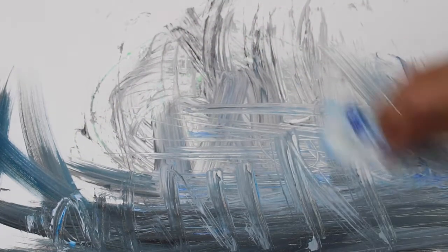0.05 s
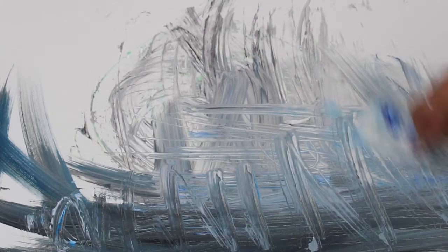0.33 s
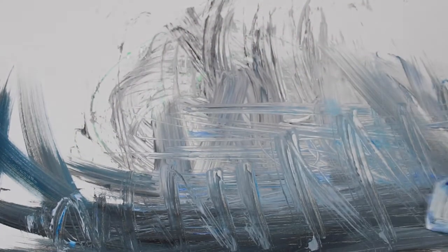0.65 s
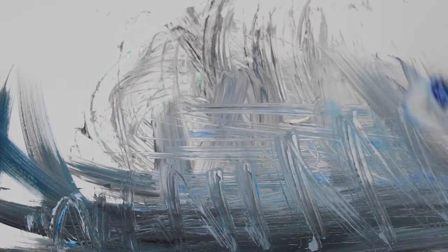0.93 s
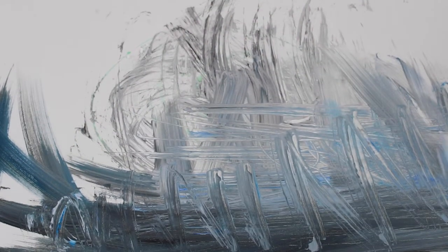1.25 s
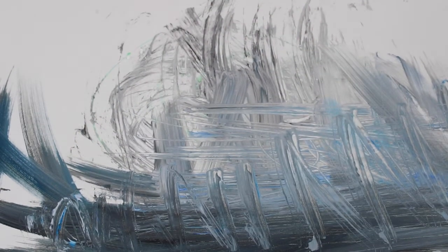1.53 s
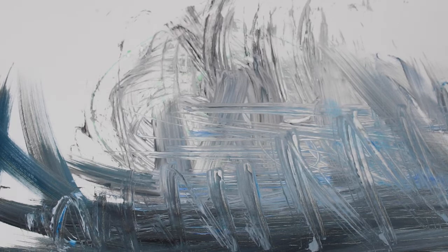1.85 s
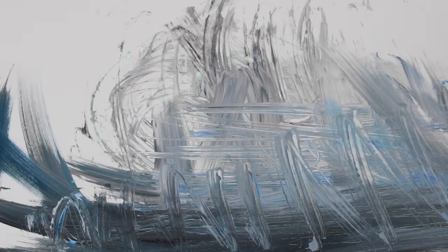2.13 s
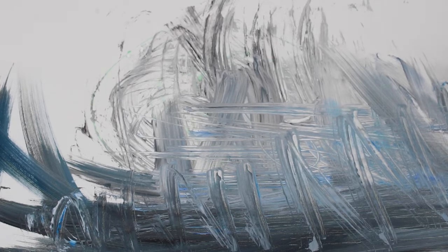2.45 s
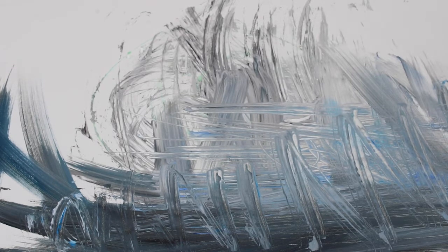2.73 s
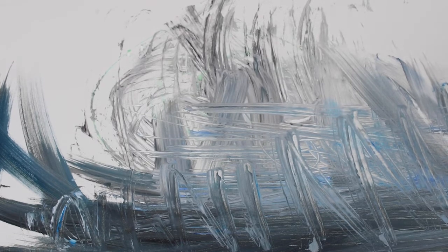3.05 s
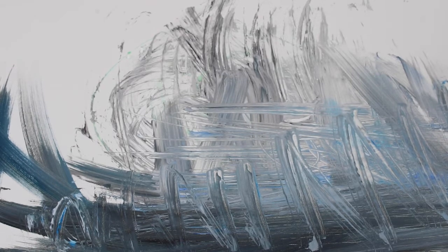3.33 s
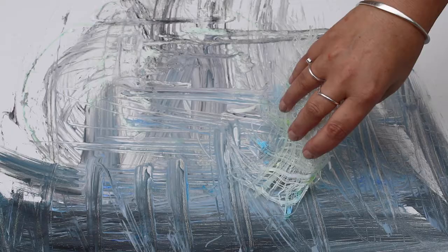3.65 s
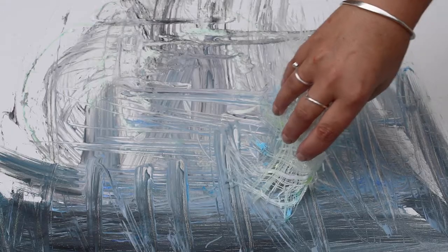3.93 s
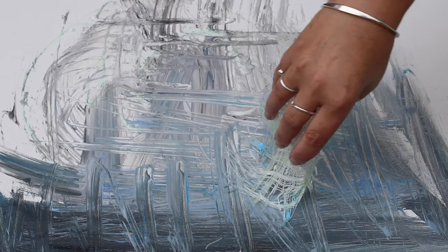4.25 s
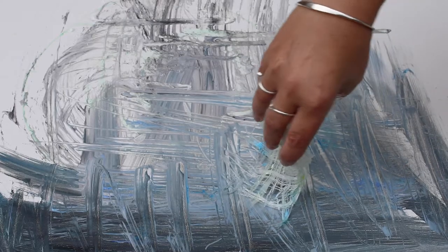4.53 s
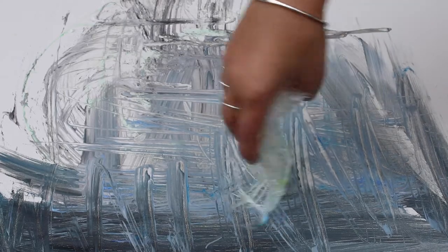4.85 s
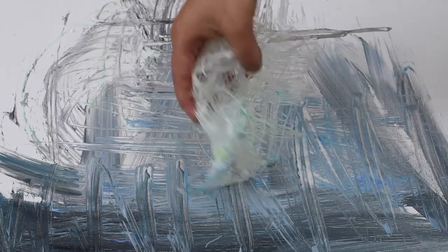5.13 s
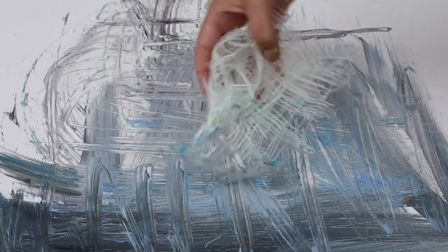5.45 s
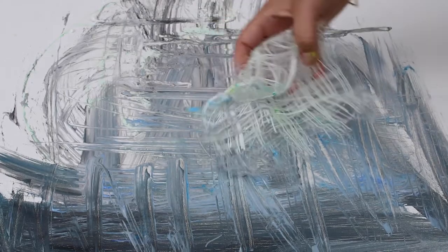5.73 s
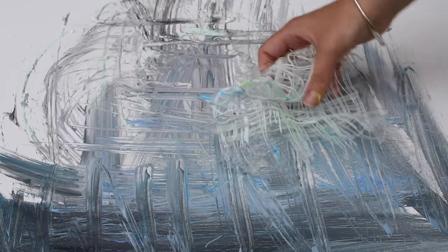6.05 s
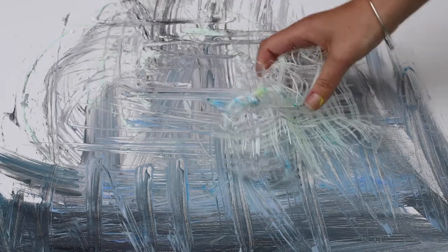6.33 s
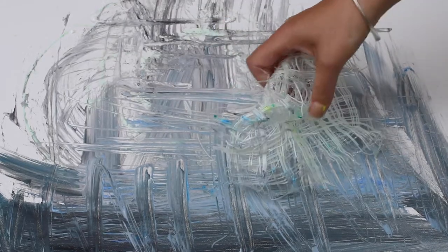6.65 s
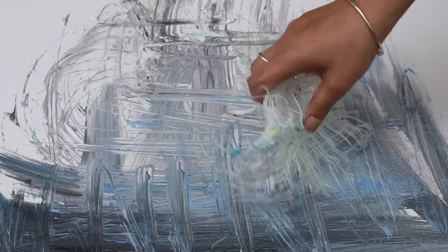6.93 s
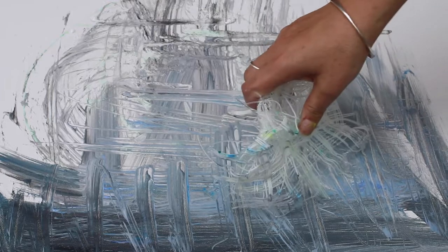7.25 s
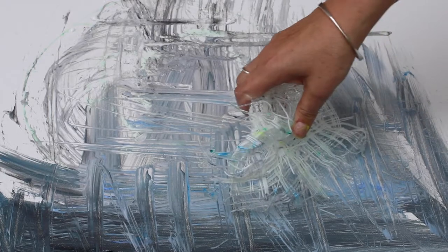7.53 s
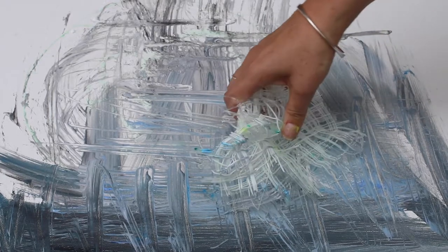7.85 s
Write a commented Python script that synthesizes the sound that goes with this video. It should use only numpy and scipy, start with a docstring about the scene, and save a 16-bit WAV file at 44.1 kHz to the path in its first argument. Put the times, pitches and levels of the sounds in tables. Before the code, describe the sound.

Close up in a small room, fast wet scrubbing opens the sound: a sponge rasps and swishes over a painted board, its ribs giving a rough, arching note with every stroke. After a short pause, a crumpled plastic mesh wad is handled, making sparse, quiet ticks and snaps. It rubs softly over the board and lands several times with a small crack and a low thud.

```python
"""A ribbed sponge scrubs back and forth through wet paint on a board, close by in a small room.
Its ribs sing a note that arches with the speed of each stroke, over a gritty rasp and a wet hiss
that grow with speed and grip: the pad bites after each turn and glides as the hand eases.
Then a wad of plastic mesh is lifted, crackling faintly, and dabbed on the board, which thuds."""
import sys
import numpy as np
from scipy import signal
from scipy.fft import rfft, irfft
from scipy.io import wavfile
from scipy.ndimage import uniform_filter1d

SR = 44100
rng = np.random.default_rng(int(sys.argv[2]) if len(sys.argv) > 2 else 0)


def master_out(mix):
    """Clip the mix to full scale and print it as 16-bit PCM to the path in sys.argv[1]."""
    frames = np.transpose(np.atleast_2d(mix))
    ceiling = np.clip(frames, -1, 1)
    pcm = np.round(ceiling * 32767).astype(np.int16)
    wavfile.write(sys.argv[1], SR, pcm)


N = 348390
TIME = np.arange(N) / SR


def sponge():
    """The scrub: rib note, rasp, wet hiss and board rumble, all riding the strokes."""
    rib_hz, bright_db, note_db, rasp_db, hiss_db = friction()
    grab_db = 0.48 * wander(70)  # the pad grabs and lets go
    note = rib_note(rib_hz) * amp(note_db - 4)
    rasp = gritty_rasp(bright_db) * amp(rasp_db + grab_db)
    hiss = wet_hiss(bright_db) * amp(hiss_db + grab_db)
    fade_out = np.clip((3.6 - TIME) / .055, 0, 1)
    return (note + rasp + hiss + board_rumble(rasp_db)) * fade_out


# Sponge strokes; lean is the push into the end of a stroke, sing is where the ribs ring best:
# start_s, bite_s, fastest_s, ease_s, stop_s, top_rib_hz, bright_db,
# note_db, rasp_db, hiss_db, lean_db, bite_db, sing_s
SPONGE_STROKES = [(-.12, -.1, -.015, .034, .05, 1350, 4, -26, -29, -29.5, -.5, 0, -.015),
                  (.03, .052, 0.135, .184, .28, 1252, 8, -25.5, -26.5, -24, 2, 0, .122),
                  (.279, .292, 0.414, .458, .502, 1376, 6, -22, -21.7, -22.7, .5, 0, .41),
                  (.489, .512, 0.602, .598, .748, 1324, 7.5, -24, -26, -26, -2, 0, .56),
                  (.736, .748, .883, .907, .957, 1268, 5.5, -24, -21.5, -23.5, -1, 0, .835),
                  (.957, .98, 1.071, 1.19, 1.199, 1230, 2, -24.5, -24.5, -25, -2, 0, 1.07),
                  (1.199, 1.222, 1.349, 1.413, 1.459, 1281, 2, -25, -21.5, -23, 3, 2, 1.4),
                  (1.436, 1.469, 1.553, 1.634, 1.697, 1274, .5, -24, -24, -22.5, -3, 3, 1.53),
                  (1.674, 1.722, 1.855, 1.907, 1.956, 1069, 1, -26, -28, -24, .5, 1, 1.84),
                  (1.946, 1.972, 2.079, 2.144, 2.243, 957, 0, -31, -30, -26, -1, 1, 2.05),
                  (2.253, 2.311, 2.431, 2.491, 2.553, 1085, 0, -24.3, -31.5, -23.2, 1, 3, 2.41),
                  (2.542, 2.572, 2.726, 2.712, 2.885, 1065, -2.5, -26, -29, -24.3, -2, 0, 2.615),
                  (2.882, 3.041, 3.101, 3.19, 3.229, 1147, -4.5, -26.5, -32, -28, -1.5, 6.5, 3.145),
                  (3.214, 3.257, 3.395, 3.39, 3.62, 1043, -2, -26, -31, -25.5, .7, 1, 3.305)]
def stroke_motion():
    """The hand speeds up, slows and turns: speed (0 to 1), progress (-1 to 1) and the live stroke."""
    speed, progress, row = np.zeros(N), np.zeros(N), np.zeros(N, int)
    for k, (start_s, _, fastest_s, _, stop_s, *_) in enumerate(SPONGE_STROKES):
        moving = np.flatnonzero((TIME > start_s) & (TIME < stop_s))
        travel = np.interp(TIME[moving], [start_s, fastest_s, stop_s], [-1, 0, 1])
        arch = np.cos(travel * np.pi / 2)
        leads = arch >= speed[moving]  # where strokes overlap, the faster wins
        at = moving[leads]
        speed[at], progress[at], row[at] = arch[leads], travel[leads], k
    return speed, progress, np.transpose(SPONGE_STROKES)[:, np.maximum.accumulate(row)]


NOTE_POWER, RASP_POWER, HISS_POWER = 1.25, 1.5, 1.85  # amplitude grows as this power of speed
CREEP = .16  # share of top speed left at a turn, where the pad still rolls over
PRESS_S, BITE_S, EASE_S = .005, .06, .03  # grip attack, decay of the bite, grip release
GLIDE_DB, NOTE_GLIDE_DB = -6, -8.5  # friction and note drop while the pad only glides
SING_DB, SING_WIDTH_S = 5, .035  # the ribs swell for a moment as they lie flat on the board
def friction():
    """Speed and grip of the pad set the rib rate and the note, rasp and hiss levels of each stroke."""
    speed, progress, stroke = stroke_motion()
    _, bite_s, _, ease_s, _, top_rib_hz, bright_db = stroke[:7]
    note_db, rasp_db, hiss_db, lean_db, bite_db, sing_s = stroke[7:]
    speed_db = 20 * np.log10(np.hypot(speed, CREEP) / np.hypot(1, CREEP))
    held_s = np.maximum(TIME - bite_s, 0)
    grip = np.minimum(held_s / PRESS_S, 1) * np.clip(1 - (TIME - ease_s) / EASE_S, 0, 1)
    press_db = lean_db * progress + GLIDE_DB * (1 - grip) + bite_db * grip * np.exp(-held_s / BITE_S)
    sing_db = NOTE_GLIDE_DB * (1 - grip) + SING_DB * np.exp(-((TIME - sing_s) / SING_WIDTH_S) ** 2)
    levels = [bright_db,
              note_db + NOTE_POWER * speed_db + sing_db,
              rasp_db + RASP_POWER * speed_db + press_db,
              hiss_db + HISS_POWER * speed_db + press_db]
    return top_rib_hz * speed, *uniform_filter1d(np.array(levels), size=150)


# Board resonances under the note, rasp and rumble: freq_hz, width_hz, gain_db
BOARD_RESONANCES = [(530, 50, -0.5), (967, 103, 3.5), (1272, 38, 9), (1305, 46, -7), (1477, 65, 2),
                    (1853, 39, 4.5), (2270, 110, 1), (2320, 45, -2), (3030, 80, 5), (3780, 91, 3)]
# Tone of the rib note: freq_hz, gain_db
NOTE_EQ = [(250, -2.5), (600, -3), (1000, -2), (1300, -3), (3000, -2.5)]
# Partials of the rib note: rib_rate_ratio, blur_hz, level_db
NOTE_PARTIALS = [(1, 32, -0.5), (1, 128, -4), (.5, 29, -19), (1.52, 71, -9), (2, 57, -13.5)]
def rib_note(rib_hz):
    """Many ribs catch at the same rate but out of step, so the note is fuzzy."""
    note = np.zeros(N)
    for ratio, blur_hz, level_db in NOTE_PARTIALS:
        sway = wander(blur_hz) + 1j * wander(blur_hz)
        sway /= np.sqrt(abs(sway) + 0.3)  # hand pressure steadies the loudness
        tone = np.exp(2j * np.pi * np.cumsum(ratio * rib_hz) / SR)
        note += amp(level_db) * unit((tone * sway).real)
    return unit(colour(note, NOTE_EQ, BOARD_RESONANCES))


# Midrange grit of the pad: freq_hz, gain_db
RASP_EQ = [(150, -36), (450, -19), (700, -6), (1000, -2), (1400, 0.5), (1950, 2), (2600, -2), (3500, -6.5),
           (4500, -17.5), (8000, -37.5)]
def gritty_rasp(bright_db):
    """Tiny slips of the pad ring the board; bright strokes have less body."""
    rasp = colour(slips(per_s=7000, spread_db=1.3), RASP_EQ, BOARD_RESONANCES)
    rasp = patchy(rasp, depth_db=2, width_hz=350, length_s=0.06)
    body, grit = split(rasp, hz=1020)
    return body * amp(-1.1 * bright_db) + grit


# Wet top end of the scrub: freq_hz, gain_db
HISS_EQ = [(1500, -30), (3000, -8), (4000, -2), (5000, 1), (6500, 0), (8200, 0), (9200, -5), (10500, -13.5),
           (12500, -23), (15000, -33), (16500, -52)]
def wet_hiss(bright_db):
    """Dense slips in wet paint; bright strokes tip from swish to fizz under a constant sheen."""
    hiss = colour(slips(per_s=14000, spread_db=2.7), HISS_EQ)
    hiss = patchy(hiss, depth_db=2, width_hz=500, length_s=0.053)
    swish, top = split(hiss, hz=6600)
    fizz, sheen = split(top, hz=10300)
    return swish * amp(-bright_db / 2) + fizz * amp(bright_db / 2) + sheen * amp(1.5)


# Low body of the scrubbed board: freq_hz, gain_db
RUMBLE_EQ = [(30, -8.5), (70, -9), (130, -8), (220, 2), (300, -3), (480, 3), (800, -4.5), (2000, -54.5)]
def board_rumble(rasp_db):
    """The board rumbles even at low speed, so it swells far less than the rasp."""
    rumble = unit(colour(rng.standard_normal(N), RUMBLE_EQ, BOARD_RESONANCES))
    return rumble * amp(0.28 * rasp_db - 33.8 + 3.8 * wander(13.3))


def board_bump(start_s=.606, pitch_hz=60.7, level_db=-25, t60_s=.086):
    """The scrubbing hand nudges the board: one soft, low push."""
    out, t = np.zeros(N), TIME[:SR]
    envelope = amp(level_db - 60 * t / t60_s) * (1 - np.exp(-t / 0.0076))
    add(out, start_s, envelope * np.sin(2 * np.pi * pitch_hz * t))
    return out


# Low modes of the struck board: pitch_hz, level_db, t60_s
THUD_MODES = [(69, -28.5, .6), (92.8, -18, 0.5), (115, -8, .26), (128.4, -9, .7), (170, 1, 0.2),
              (203, -11, 0.25), (220, -1.5, .36), (239.3, -6, 0.32), (268.5, -5, 0.28), (328, 3, 0.079),
              (388, -5, 0.095), (646, -11, 0.094), (780, 8, 0.044)]
# Mesh hits on the board: start_s, crack_db, treble_db, thud_db
MESH_DABS = [(5.35, -38, -15, -43.5), (6.2958, -11, -3.5, -27), (6.527, -25, 2, -49), (7.018, -12, -4, -35),
             (7.372, -13.5, -5.5, -31), (7.8218, -12, 0, -41), (7.8264, -13.5, -2.5, -33)]
def dabs():
    """The wad meets the board: a crack of plastic over the thud of the board's low modes."""
    out, t = np.zeros(N), TIME[:SR]
    attack = 1 - np.exp(-t / 0.00041)
    for start_s, crack_db, treble_db, thud_db in MESH_DABS:
        add(out, start_s, amp(crack_db) * click(treble_db, t60_s=0.036))
        thud = sum(amp(db - 60 * t / t60_s) * np.sin(2 * np.pi * (hz * t + rng.random()))
                   for hz, db, t60_s in THUD_MODES)
        add(out, start_s, amp(thud_db) * thud * attack)
    return out


# Squeezes of the wad: start_s, length_s, level_db
MESH_SQUEEZES = [(4.3, 1, -63), (5.55, 0.49, -67), (6.3, 0.62, -64), (6.8, .2, -49), (7.24, .2, -54),
                 (7.4, .5, -64)]
def mesh_crackle(per_s=55, spread_db=5, t60_s=0.0086, pitches=24):
    """Tiny wet strands part as the wad is squeezed, each a brief tick around its own pitch."""
    out, t = np.zeros(N), TIME[:1024]
    envelope = amp(-60 * t / t60_s) * (1 - np.exp(-t / 0.00056))
    ticks_per_pitch = int(per_s * N / SR / pitches) + 1
    for hz in np.geomspace(5030, 12200, pitches):
        roughness = 1 + 2 * uniform_filter1d(rng.standard_normal(len(t)), size=14)
        tick = np.sin(2 * np.pi * hz * t) * envelope * roughness
        for position, chance in rng.random((ticks_per_pitch, 2)):
            add(out, position * N / SR, tick * amp(-spread_db * np.log(chance + .05)))
    return unit(out) * swells(MESH_SQUEEZES)


# Dull tone of the dragged wad: freq_hz, gain_db
DRAG_EQ = [(40, -13), (90, 5), (150, 0), (240, -2), (350, -5), (600, -19), (1600, -29), (4000, -42)]
# Drags across the board: start_s, length_s, level_db
MESH_DRAGS = [(6.42, .3, -46.5), (6.801, .34, -46), (7.348, 0.29, -54.5)]
def mesh_drag():
    """The wad rubs over the board with a low rumble."""
    return unit(colour(rng.standard_normal(N), DRAG_EQ)) * swells(MESH_DRAGS)


# Featured snaps in the mesh: start_s, level_db, treble_db, ring_hz
STRAND_SNAPS = [(4.369, -33.5, 2, 9900), (4.509, -42, 7, 2100), (4.588, -36, 9, 3420),
                (4.629, -27.5, 11, 3400), (4.784, -29, 9.5, 9000), (4.817, -31, 1.5, 3400),
                (5.351, -37, -16, 1590), (5.416, -33.5, -5.5, 1600), (5.98, -43, 2, 8600),
                (6.2, -36, 6, 1500), (6.394, -41, -2, 1500), (6.511, -36.5, -8, 1600),
                (6.818, -29.5, 4, 1690), (6.831, -20.5, 0, 8550), (6.852, -28, -5, 1690),
                (6.888, -26, 13, 7550), (6.913, -34, -2, 1600), (6.931, -26.5, 1, 1600),
                (6.961, -26, -6, 3150), (7.002, -33, -5, 1590), (7.084, -35.5, -9, 1500),
                (7.315, -38.5, 7, 1500), (7.447, -37, -5, 1600), (7.533, -28.5, -10.5, 1200),
                (7.543, -28.5, -16, 1500), (7.627, -39.5, -17, 1500), (7.818, -19, 0, 1440)]
def mesh_snaps():
    """Single strands snap as the wad is handled."""
    out = np.zeros(N)
    for start_s, level_db, treble_db, ring_hz in STRAND_SNAPS:
        add(out, start_s, amp(level_db) * strand(treble_db, ring_hz, lift_db=7.5))
    return out


# Flurries of faint snaps: start_s, length_s
SNAP_FLURRIES = [(7.1, .03), (7.45, .07)]
def mesh_spring_back(per_s=55):
    """Strands slip free at random as the wad springs back after a dab."""
    out = np.zeros(N)
    for start_s, length_s in SNAP_FLURRIES:
        for _ in range(round(per_s * length_s)):
            force, brightness = rng.standard_normal(2)
            snap = strand(treble_db=-2 + 8 * brightness, ring_hz=1600, lift_db=3)
            add(out, start_s + length_s * rng.random(), amp(-39.5 + 1.2 * force) * snap)
    return out


def strand(treble_db, ring_hz, lift_db):
    """One snap: a click with a resonance of its own that adds colour but no energy."""
    sound = click(treble_db - 0.5, t60_s=0.039)
    rung = colour(sound, eq=[(20, 0), (20000, 0)], peaks=[(ring_hz, ring_hz / 5, lift_db), (8700, 800, 3)])
    return rung * np.linalg.norm(sound) / np.linalg.norm(rung)


# Tone of a plastic click: freq_hz, gain_db
CLICK_EQ = [(60, -27), (300, -8), (520, -7), (750, -1), (1050, -0.5), (1500, 0.5), (2200, -2), (3000, -2.5),
            (4000, -4), (5500, -8), (8200, -6.5), (10500, -12), (13000, -18.5), (16000, -36)]
def click(treble_db, t60_s, rattle_db=1.5):
    """A sharp release, then a short dense rattle of the strands; its first 3 ms have rms 1."""
    t = TIME[:4096]
    rattle = rng.standard_normal(len(t)) * amp(-60 * t / t60_s)
    release = amp(rattle_db) * rattle / np.linalg.norm(rattle)
    release[0] += 1
    sound = colour(release, CLICK_EQ, treble_db=treble_db)
    return sound / np.sqrt(np.mean(sound[:132] ** 2))


# Decay of the small room: freq_hz, t60_s
ROOM_DECAY = [(100, 0.44), (400, 0.2), (1500, 0.15), (5000, 0.095), (12000, 0.078)]
def room_reverb(send, predelay_s=0.0072, echoes_per_s=3000):
    """Sparse reflections from nearby walls, each band dying at its own speed."""
    echoes = rng.choice([-1., 1.], SR) * (rng.random(SR) < echoes_per_s / SR) * (TIME[:SR] > predelay_s)
    hz, t, bands = signal.stft(echoes, SR, nperseg=256)
    tail = signal.istft(bands * amp(-60 * t / read(ROOM_DECAY, hz)[:, None]), SR)[1]
    return signal.fftconvolve(send, tail / np.linalg.norm(tail))[:N]


# Tone of the air: freq_hz, gain_db
AIR_EQ = [(12, -42), (20, -13), (48, -3.5), (81, -7), (154, -5), (177, -6.5), (347, -6.5), (499, -9.5),
          (542, -12), (624, -9.5), (718, -11), (1090, -12), (3840, -20.5), (10500, -33), (16000, -61)]
# Fader ride on the air: time_s, level_db
AIR_FADER = [(0, -57.5), (3.7, -48.5), (6.25, -47), (7.2, -49.5), (7.9, -47)]
def room_tone():
    """A soft, dull wash of air."""
    level_db = np.interp(TIME, *np.transpose(AIR_FADER))
    return unit(colour(rng.standard_normal(N), AIR_EQ)) * amp(level_db)


def slips(per_s, spread_db):
    """A random train of tiny releases, a few much larger than the rest."""
    size = amp(spread_db * np.minimum(rng.exponential(1, N), 4))
    return unit(size * rng.choice([-1, 1], N) * (rng.random(N) < per_s / SR))


def patchy(x, depth_db, width_hz, length_s):
    """Patches of the spectrum come and go as the contact keeps changing."""
    hz, t, bands = signal.stft(x, SR, nperseg=512, noverlap=384)
    patches = rng.standard_normal(bands.shape)
    patches = uniform_filter1d(patches, max(int(width_hz / hz[1]), 1), axis=0)
    patches = uniform_filter1d(patches, max(int(length_s / t[1]), 1), axis=1)
    return unit(signal.istft(bands * amp(depth_db * unit(patches)), SR, noverlap=384)[1][:N])


def wander(hz, size=16384):
    """Random drift of rms 1, rolled off above hz."""
    step_s = N / SR / size
    drift = irfft(rfft(rng.standard_normal(size)) / (1 + (np.fft.rfftfreq(size, step_s) / hz) ** 4))
    return unit(np.interp(TIME, np.arange(size) * step_s, drift))


def swells(gestures):
    """An envelope in which each gesture rises from nothing to its level and sinks back."""
    out = np.zeros(N)
    for start_s, length_s, level_db in gestures:
        add(out, start_s, amp(level_db) * np.sin(np.pi * np.arange(0, length_s, 1 / SR) / length_s))
    return out


def colour(x, eq, peaks=(), treble_db=0, size=8192):
    """Minimum-phase filter from an EQ curve, resonant peaks and a treble shelf."""
    hz = abs(np.fft.fftfreq(size, 1 / SR))
    db = read(eq, hz) + treble_db * read([(2500, 0.0099), (7000, 0.99)], hz)
    db += sum(lift / (1 + (2 * (hz - centre) / width) ** 2) for centre, width, lift in peaks)
    response = np.exp(np.conj(signal.hilbert(np.log(amp(db)))))
    taps = np.fft.ifft(response).real[:size // 2]
    return signal.oaconvolve(x, taps)[:len(x)]


def split(x, hz):
    """Crossover: the parts below and above hz."""
    high = signal.sosfiltfilt(signal.butter(2, hz, "high", fs=SR, output="sos"), x)
    return x - high, high


def read(points, hz):
    """Reads a curve on a log-frequency axis."""
    freq_hz, value = np.transpose(points)
    return np.interp(np.log(hz + 1), np.log(freq_hz + 1), value)


def add(mix, start_s, sound):
    """Mixes a sound in at start_s."""
    part = mix[max(round(start_s * SR), 0):][:len(sound)]
    part += sound[:len(part)]


def amp(db):
    """Decibels to gain."""
    return 10 ** (np.asarray(db) / 20)


def unit(x):
    """Scales to rms 1."""
    return x / np.sqrt(np.mean(x ** 2) + 1e-20)


def scene():
    """The sponge, then the mesh, in mono with a touch of room."""
    scrub = sponge() + board_bump()
    wad = mesh_crackle() + mesh_drag() + mesh_snaps() + mesh_spring_back() + dabs()
    reverb = room_reverb(amp(-15.5) * scrub + amp(-15) * wad)
    return (scrub + wad + reverb + room_tone())[None]


def record(dry, ceiling=.92, cutoff_hz=15500):
    """Hard clip on the sharpest cracks, then a steep low-pass."""
    low_pass = signal.firwin(255, cutoff_hz, window=("kaiser", 9), fs=SR)
    return signal.oaconvolve(np.clip(dry, -ceiling, ceiling), low_pass[None], "same")


dry = scene()
out = record(dry)
master_out(out)
```